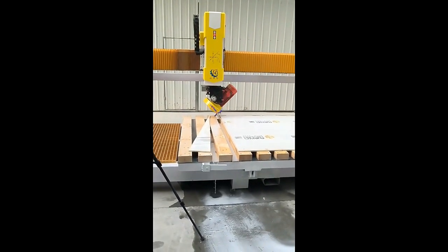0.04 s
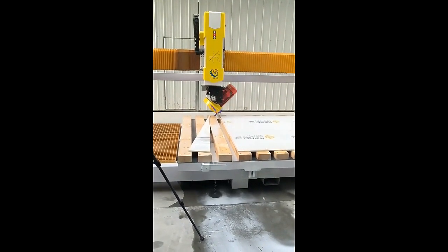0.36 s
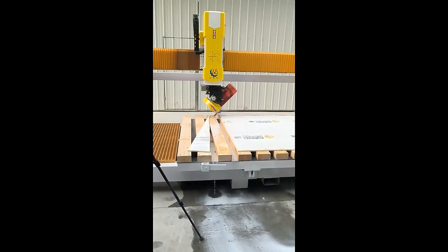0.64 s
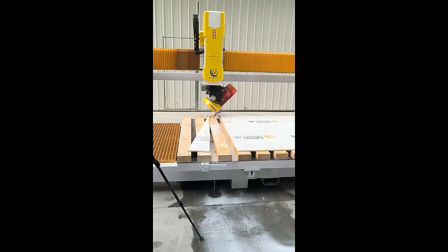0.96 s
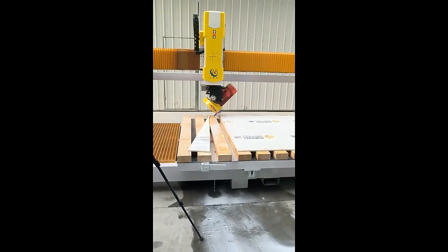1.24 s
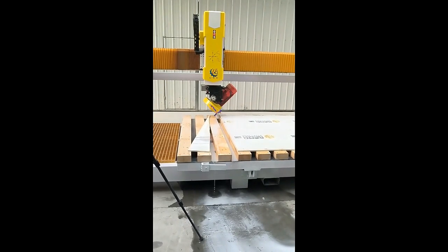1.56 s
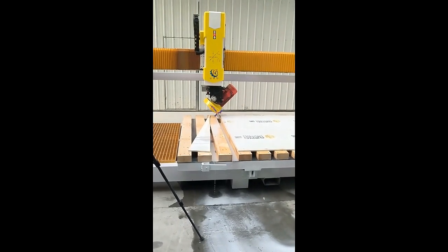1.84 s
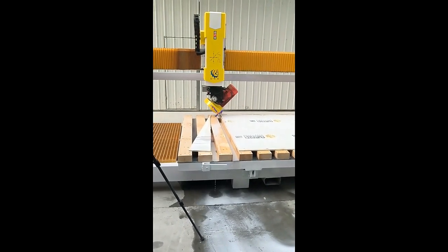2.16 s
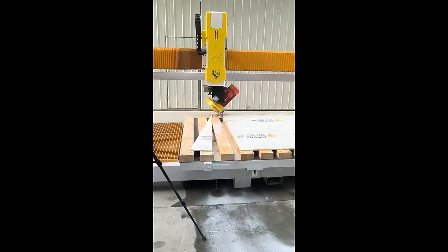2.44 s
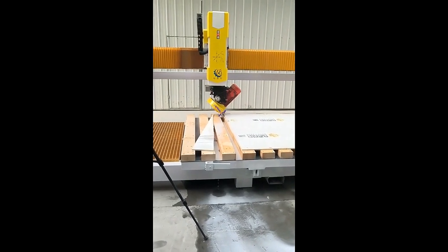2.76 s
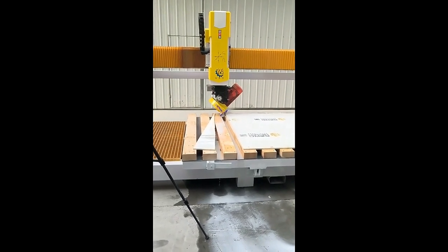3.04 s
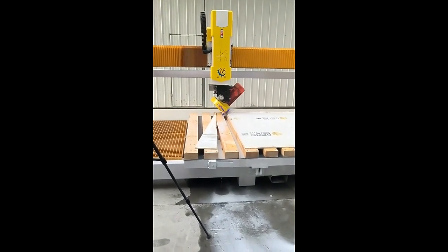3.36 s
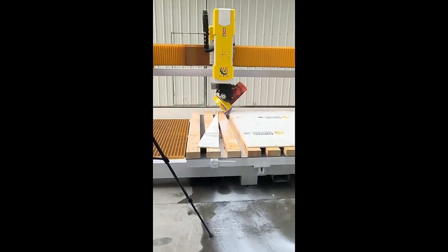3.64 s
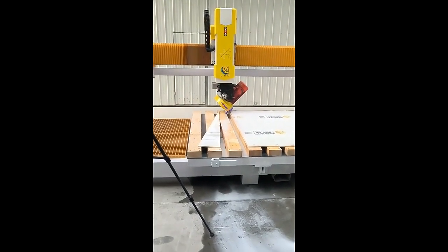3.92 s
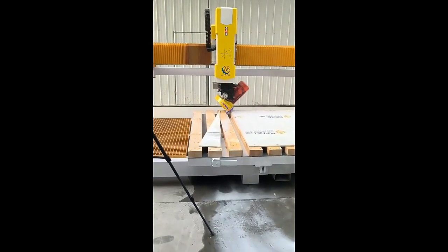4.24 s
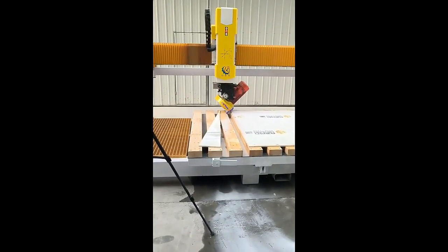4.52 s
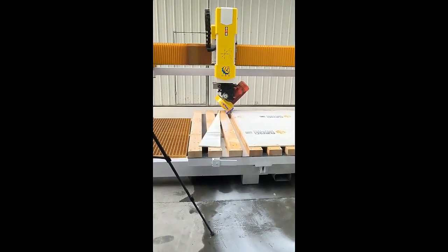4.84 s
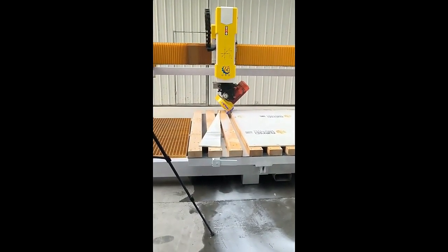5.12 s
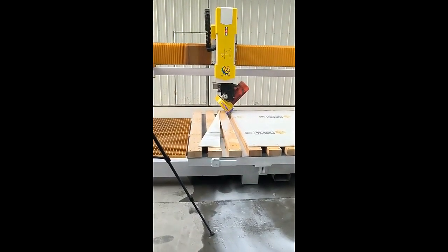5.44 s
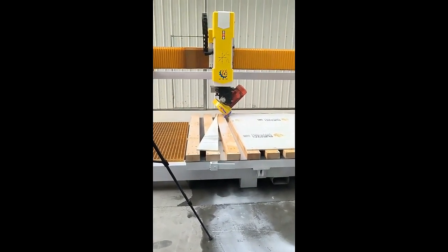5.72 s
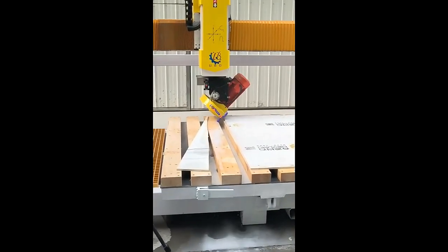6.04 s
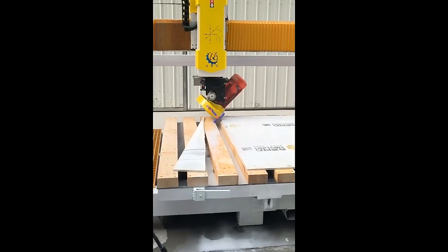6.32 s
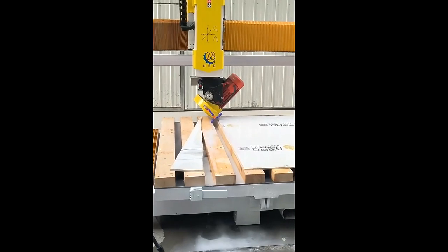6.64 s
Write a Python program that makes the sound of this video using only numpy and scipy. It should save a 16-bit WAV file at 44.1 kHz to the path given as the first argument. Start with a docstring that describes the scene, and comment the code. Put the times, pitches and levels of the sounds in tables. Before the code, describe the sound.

A stone saw hums with hissing cooling water, then its blade bites into a slab with a loud, harsh, ringing grind.

```python
"""A bridge saw for stone hums in a workshop, its blade spinning free in the hiss of cooling water.
Two short spurts of air and water escape a valve, and a few drops tick on the wet table.
Near 3 s the blade crunches into the slab: each turn of its rim repeats nearly the same scrape,
a harsh buzz in a hiss of grit and spray. The steel rings and squeals in shifting modes,
finds its groove, and the slab drones louder as the cut deepens."""
import sys
import numpy as np
from scipy import signal
from scipy.fft import irfft
from scipy.io import wavfile
from scipy.ndimage import map_coordinates

SR = 44100
rng = np.random.default_rng(int(sys.argv[2]) if len(sys.argv) > 2 else 0)


def store_pcm(level_fs):
    """Save levels as 16-bit WAV."""
    pcm = np.round(np.clip(level_fs, -1, 1) * 32767).astype(np.int16)
    wavfile.write(sys.argv[1], SR, np.atleast_2d(pcm).T)


N = 303408
HOP = 256
TIME = np.arange(N) / SR
FRAME_S = np.arange(N // HOP + 5) * HOP / SR
BIN_HZ = np.fft.rfftfreq(4 * HOP, 1 / SR)

FREE_HZ, LOADED_HZ = 49.92, 49.73  # blade turns per second
BITE_S = 2.912
# faders of the cut's layers: (grazing [dB], full depth [dB])
DRONE_DB, BUZZ_DB, GRIND_DB = (-27.5, -19), (-28, -27), (-20, -23)

# tone colour of the rim's scrape: (frequency [Hz], level [dB])
SCRAPE_EQ = [(1900, -47), (2050, -4), (2200, -5.5), (2600, -0.5), (3600, -2.5), (4400, -3.5), (5200, -0.5),
             (6500, -2), (7800, -4), (8700, -11), (9300, -9), (11000, -14), (12000, -27)]
# tone colour of loose grit and spray: (frequency [Hz], level [dB])
SPRAY_EQ = [(30, -34), (70, -44), (130, -6.5), (220, 4), (400, -6.5), (600, -23), (900, -14.5),
            (1400, -5.5), (2200, -4.5), (3200, -6), (4400, -6.5), (6500, -4.5), (9000, -2), (11500, -12)]
# modes of the steel blade: (frequency [Hz], width [Hz], grazing boost [dB], full-depth boost [dB])
BLADE_MODES = [(2367, 97, -10, 3.5), (2622, 18, 7, 16.5), (2810, 93, -1.5, 6), (3040, 43, 2, 6.5),
               (3170, 90, 1.5, -1), (3270, 77, 7, 2), (3625, 82, 8.5, 8), (4150, 130, 6.5, 3.5),
               (4480, 92, 7, 1.5), (5156, 105, 10, 8), (5634, 48, 14, 9), (5850, 100, 3, 3),
               (6375, 200, 6, 7), (6640, 45, 16, 3.5), (6980, 200, 7.5, 3.5), (7300, 250, 1, 3),
               (8220, 80, 5, 9.5), (8390, 120, 6.5, 13), (9070, 190, 1.5, 6.5), (9400, 200, 5.5, 6),
               (9900, 150, 7, 9.5), (10970, 790, 7.5, 7)]
# hollows where the blade hardly radiates: (frequency [Hz], width [Hz], gain [dB])
BLADE_HOLLOWS = [(2150, 130, -3), (2470, 70, -4), (2930, 90, -8), (3300, 70, -4), (3890, 130, -7),
                 (4280, 110, -6), (6070, 90, -3), (8700, 260, -2.5)]
# the rim catches and a tone sings out: (time [s], length [s], frequency [Hz], width [Hz], boost [dB])
RIM_SQUEALS = [(2.97, .13, 2680, 90, 12), (3.03, .1, 1193, 50, 9), (3.1, .2, 1392, 50, 7),
               (3.29, .2, 1590, 60, 3), (3.22, .3, 696, 50, 5), (3.05, .17, 5090, 110, 7),
               (3.08, .1, 5635, 90, 7), (3.13, 0.13, 4840, 110, 16), (3.26, .12, 5700, 80, 5),
               (3.51, .17, 1243, 50, 12), (3.51, 0.18, 5635, 100, 10), (3.59, .2, 895, 55, 11),
               (3.6, .14, 8490, 90, 6), (3.75, .3, 1545, 50, 3), (3.66, 0.28, 299, 50, 8),
               (3.75, .4, 249, 45, 6), (4.098, .5, 302, 50, 8.5), (3.84, .13, 5130, 130, 4),
               (3.85, .14, 8500, 90, 8), (3.95, .3, 8265, 70, 8), (3.94, .18, 6715, 90, 7),
               (3.93, .55, 5630, 90, 6), (4.07, .17, 7000, 170, 10), (4.35, .18, 6180, 100, 12),
               (4.42, .24, 5680, 90, 7), (4.35, 0.55, 5925, 100, 8), (4.35, .5, 7270, 260, 4),
               (4.397, .5, 1335, 100, 3), (4.7, .55, 1392, 50, 8), (4.78, .3, 720, 220, 2),
               (4.76, .25, 3140, 220, 6), (5.0, .3, 1180, 90, 7), (5.3, .25, 3740, 90, 9),
               (4.75, 0.65, 9180, 160, 8), (4.9, .18, 6715, 100, 12), (5.0, .26, 6390, 140, 9),
               (5.0, 0.65, 994, 50, 7), (5.1, .7, 646, 50, 6), (5.95, .6, 845, 50, 5),
               (6.25, .8, 1640, 50, 8), (6.4, .35, 1392, 50, 6), (6.55, .6, 3630, 150, 2),
               (5.6, .34, 7280, 130, 7), (5.97, .46, 7350, 130, 6), (5.77, 1.0, 7340, 380, 8),
               (6.7, .12, 5620, 90, 6), (6.682, .7, 1292, 45, 9), (6.6, .6, 6560, 350, 5),
               (6.8, 0.28, 6650, 110, 11)]
# the slab's drone: (multiple of blade speed, grazing level [dB], full-depth level [dB])
DRONE_PARTIALS = [(2, -49, -45), (3, -9.5, -11.5), (4, 3.5, 0.5), (5, -30.5, -10.5), (6, -16, -10.5),
                  (7, -4, -21.5), (8, -21, -21.5), (9, -7.5, -29)]
# modes of slab and frame: (frequency [Hz], width [Hz], grazing level [dB], full-depth level [dB])
SLAB_MODES = [(497, 40, -16, -23), (546, 29, -9.5, -11), (601, 45, -32, -19), (697, 75, -11, -13.5),
              (746, 40, -20, -15), (807, 33, -10, -19.5), (875, 75, -16.5, -21), (945, 44, -22, -12.5),
              (995, 40, -24, -18.5), (1140, 56, -24, -15.5), (1296, 110, -7, -11.5), (1370, 32, -5, -21),
              (1570, 63, -3, -9.5), (2010, 840, -18, -16)]
# the blade damps the slab's low modes: (time [s], length [s], frequency [Hz], width [Hz], gain [dB])
SLAB_DAMPS = [(3.3, .45, 149, 45, -3), (3.57, 0.16, 190, 70, -4.5), (3.55, .17, 590, 340, -10),
              (3.5, .35, 447, 45, -3), (3.73, .08, 950, 180, -8), (4.0, .9, 555, 53, -8),
              (4.05, 0.6, 410, 110, -6), (3.85, .7, 830, 130, -6), (4.25, 1.1, 944, 50, -7),
              (4.85, .7, 1050, 70, -9), (4.95, .7, 1445, 50, -7), (6.05, .65, 497, 45, -9),
              (6.05, .4, 795, 50, -8), (6.25, 1.0, 1590, 50, -6), (6.6, .55, 720, 150, -4)]
# the stone resists more, or gives way: (time [s], length [s], push [dB])
LOAD_SURGES = [(3.226, 0.22, 1), (3.91, 0.4, -0.5), (5.463, 0.19, -2.5), (6.724, 0.11, 2)]
# the blade chips the edge: (time [s], length [s], frequency [Hz], width [Hz], level [dB])
EDGE_CHIPS = [(2.955, 0.09, 1500, 600, -28.5), (2.97, 0.062, 7000, 3500, -34), (3.352, 0.061, 630, 80, -41),
              (3.358, 0.076, 1450, 450, -47)]
# tones of the motors and the free blade: (frequency [Hz], level [dB])
MOTOR_TONES = [(99.9, -53), (199.9, -62), (246.3, -59), (249.5, -59), (281.4, -46.5), (289.2, -67),
               (299.6, -38.5), (318.0, -52.5), (349.5, -61), (364, -62), (417.9, -53), (599.1, -60),
               (1135.4, -62), (1248.3, -66), (1398.0, -53), (1447.8, -62), (1497.9, -62), (1547.7, -56.5)]
# spurts of air and water:
# (time [s], length [s], level [dB], fade [dB/s], treble peak [Hz], spit pitch [Hz], spit boost [dB])
VALVE_SPURTS = [(0.013, 0.089, -35, 6, 7200, 1800, -0.5), (1.525, 0.082, -32, 103, 5700, 1970, 17.5)]
# tone colour of a spurt: (multiple of its treble peak, level [dB])
SPURT_EQ = [(.05, -30), (.13, -9), (.22, -1), (.35, -7), (.55, -6.5), (.8, -4.5), (1, -1.5), (1.2, -2),
            (1.4, -12), (1.8, -22)]
# tone colour of cooling water and workshop air: (frequency [Hz], level [dB])
WATER_EQ = [(18, -76), (32, -60), (86, -19), (229, -6.5), (294, -6), (350, -4), (536, -13), (821, -16.5),
            (1420, -17), (1700, -16.5), (2870, -22), (3280, -25), (4000, -22.5), (6410, -22), (9340, -19),
            (12000, -24.5), (15600, -61), (22000, -120)]
# bands in which the water nozzle sings: (frequency [Hz], width [Hz], boost [dB])
NOZZLE_BANDS = [(1150, 240, 7), (6560, 690, 5.5), (8370, 170, 6), (9540, 390, 4), (11060, 700, 4.5)]
# larger drops of cooling water: (time [s], frequency [Hz], level [dB])
WATER_DRIPS = [(0.555, 6000, -43), (1.885, 5500, -43), (2.248, 2800, -45)]


def cutting(grazing_share=0.49, deep_share=0.53):
    """The blade bites: the rim scrapes, grit and water spray, and the slab shakes."""
    turns = np.cumsum(blade_speed(TIME)) / SR
    depth = sunk(FRAME_S)[:, None]
    scrape_share = grazing_share + sunk(TIME) * (deep_share - grazing_share)
    # random peaks and hollows come and go, strongest around 2-5 kHz
    patchy_db = patches(seconds=.2, width_hz=90) * (1 + 2.3 * bell(BIN_HZ, 3300, 3000))
    grind = np.sqrt(scrape_share) * scrape(turns, depth, patchy_db)
    grind += np.sqrt(1 - scrape_share) * spray(turns, depth, patchy_db)
    grind *= load_gain(GRIND_DB, TIME, push_share=0.08)
    contact = ramp(TIME, BITE_S, 0.033)
    return contact * (slab_shaking(turns, depth) + chips() + rumble() + grind)


def scrape(turns, depth, patchy_db, wear_s=0.29, chatter_s=0.024, sweep_hz=3300, lock_db=15, count=242):
    """The diamond segments repeat their scrape every turn; it changes slowly as the contact shifts."""
    hz = np.arange(1, count + 1) * LOADED_HZ
    lasting = 0.45 * (1 + depth) / 2 * np.exp(2j * np.pi * rng.random(count))
    wear = drift(wear_s, count)
    # a proud segment strikes; the steel spreads the blow
    strike = 0.41 * np.exp(1j * np.pi * hz ** 2 / (sweep_hz * LOADED_HZ))
    jitter = 0.38 + 0.05 * seated(FRAME_S)[:, None]
    chatter = jitter * hz / 6000 * drift(chatter_s, count)  # smears the high partials most
    rim = lasting + wear + strike + chatter
    boost_db = blade_ringing(hz)
    locked = np.clip(boost_db / lock_db, 0, 1) ** 2  # partials on a strongly ringing mode hold steady
    rim /= (abs(rim) + 1e-9) ** locked
    tilt_db = 3 * (1 - depth) * np.log2(hz / 5000)
    db = boost_db + (1 - locked) * patchy_db[:, np.searchsorted(BIN_HZ, hz)] + tilt_db
    return spin(levelled(colour(SCRAPE_EQ, hz) * amp(db) * rim), turns)


def spray(turns, depth, patchy_db, ring_share=0.69, flicker_db=1.23):
    """Grit and water fly off the rim in surges, brighter and crunchier while the cut is shallow."""
    open_db = (1 - depth) * (4 * bell(BIN_HZ, 9100, 8700) + 3 * bell(BIN_HZ, 1900, 710))
    thin_db = -9 * (1 - depth ** 2) * bell(BIN_HZ, 310, 450)
    db = ring_share * blade_ringing(BIN_HZ) + patchy_db + open_db + thin_db
    shape = levelled(colour(SPRAY_EQ, BIN_HZ) * amp(db))
    hiss = noise(shape * amp(slab_damping(BIN_HZ) + flicker_db * drift(0.02).real))
    angle = 2 * np.pi * turns
    return hiss * (1 + 0.078 * np.cos(angle) + 0.11 * np.cos(2 * angle))


def blade_ringing(hz, skating_waver=0.0022, seated_waver=.0012, flutter=0.2):
    """A moving EQ in dB: the steel's wavering modes, the hollows between them and the squeals."""
    t = FRAME_S[:, None]
    waver = skating_waver + (seated_waver - skating_waver) * seated(t)
    wanders = drift(0.063, len(BLADE_MODES)).T[:, :, None]
    modes = 0
    for (f, width, grazing, deep), wander in zip(BLADE_MODES, wanders):
        boost_db = (grazing + (deep - grazing) * sunk(t)) * (1 + flutter * wander.imag)
        modes += boost_db * bell(hz, f * (1 + waver * wander.real), width)
    hollows = sum(db * bell(hz, f, width) for f, width, db in BLADE_HOLLOWS)
    squeals = sum(db * held(t, s, length) * bell(hz, f, width) for s, length, f, width, db in RIM_SQUEALS)
    return modes + hollows + squeals


def slab_shaking(turns, depth, rasp_s=4.6, build_s=0.084, count=40):
    """The uneven rim pushes the slab as it turns: a drone and a buzz that steady as the cut deepens."""
    order = np.arange(1, count + 1)
    hz = order * LOADED_HZ
    low = hz < 450
    sway_db = (1 - depth) * curve(DRONE_PARTIALS, order) + depth * curve(DRONE_PARTIALS, order, column=2)
    db = np.where(low, sway_db, slab_response(hz, depth)) + blade_ringing(hz)
    looseness = np.where(low, .35, 1)  # the heavy low modes are the steadiest
    roughness = looseness * (0.64 - 0.19 * depth)
    # midway the upper partials pull closer into step: one hard rasp a turn
    rasping = 0.23 * bell(FRAME_S, rasp_s, 1.7)[:, None] * (hz > 1100)
    # the wobbling blade sways and knocks the slab; the hall scatters the knocks
    scatter = (1 - rasping) * 1.48 * looseness * rng.standard_normal(count)
    phases = np.exp(1j * (np.pi / 2 * order ** 2 * low + scatter))
    unsteady = 1 + roughness * (drift(0.25, count) + .5 * drift(0.014, count))
    partials = amp(db) * phases * unsteady
    t = FRAME_S[:, None]
    drone = load_gain(DRONE_DB, t, push_share=0.61) * levelled(partials * low * (order > 1))
    buzz = load_gain(BUZZ_DB, t, push_share=1) * levelled(partials * ~low)
    age = np.maximum(t - BITE_S, 0)
    build_up = 1 - np.exp(-(age / build_s) ** 2 * hz / 200)  # low modes answer late
    return spin((drone + buzz) * build_up * amp(slab_damping(hz)), turns)


def slab_response(hz, depth, valley_db=-29):
    """Resonances of slab and frame in dB; depth shifts the weight among the modes."""
    power = sum((amp(grazing + (deep - grazing) * depth) / (1 + (2 * (hz - f) / width) ** 2)) ** 2
                for f, width, grazing, deep in SLAB_MODES)
    return 10 * np.log10(power + amp(valley_db) ** 2)


def slab_damping(hz):
    """Passing notches in dB where the advancing blade presses on the slab."""
    return sum(db * held(FRAME_S[:, None], s, length) * bell(hz, f, width)
               for s, length, f, width, db in SLAB_DAMPS)


def blade_speed(t, slowing_s=0.3542, sag_s=3.46, sag_hz=.45):
    """Turns per second: the blade slows under load and sags once before the motor catches up."""
    return FREE_HZ + (LOADED_HZ - FREE_HZ) * ramp(t, BITE_S, slowing_s) - sag_hz * bell(t, sag_s, .22)


def sunk(t):
    """Depth of the cut, 0-1: after grazing the edge the blade sinks, quickly at first."""
    return 1 - (1 - ramp(t, start_s=3.46, length_s=1.83)) ** 2


def seated(t):
    """0 while the blade skates on the edge, 1 once it runs in its groove."""
    return ramp(t, start_s=3.7, length_s=0.18)


def load_gain(levels_db, t, push_share, load_power=3.2):
    """Fader ride for one layer of the cut: it follows the load, and its share of each surge."""
    grazing_db, deep_db = levels_db
    push_db = sum(db * bell(t, s, length) for s, length, db in LOAD_SURGES)
    return amp(grazing_db + (deep_db - grazing_db) * sunk(t) ** load_power + push_share * push_db)


def chips():
    """The edge crumbles: short rough bursts in the slab's resonances."""
    return sum(amp(db) * held(TIME, s, length) * noise(bell(BIN_HZ, f, width))
               for s, length, f, width, db in EDGE_CHIPS)


def rumble(db=-67, lumpy_db=10):
    """Faint, lumpy bass under the cut."""
    lumps = amp(lumpy_db * np.tanh(drift(0.06).real))
    return amp(db) * noise(bell(BIN_HZ, 55, 80) * lumps)


def motor_hum(waver=0.021, throb=0.2, ebb_s=1.15):
    """Motors and free blade hum; the close tones near 300 Hz beat unevenly and ebb once."""
    ebb_db = -10.5 * bell(TIME, ebb_s, 1.0)
    count = len(MOTOR_TONES)
    out = np.zeros(N)
    for (hz, db), slow, quick in zip(MOTOR_TONES, drift(0.27, count).T, drift(0.047, count).T):
        beating = bell(hz, 319, 52)
        unsteady = np.interp(TIME, FRAME_S, 1 + waver * slow + throb * beating * quick)
        tone = np.exp(2j * np.pi * (hz * TIME + rng.random()))
        out += amp(db + ebb_db * beating) * (unsteady * tone).real
    return np.sqrt(2) * out


def spurts(rise_s=0.00073, tail_s=0.028, spit_width_hz=950, sputter_hz=85):
    """A valve lets out a sputtering hiss that loses pressure, then dies away in the hall."""
    out = np.zeros(N)
    for s, length, db, fade_db_per_s, bright_hz, spit_hz, spit_db in VALVE_SPURTS:
        age = np.maximum(TIME - s, 0)
        gate = ramp(TIME, s, rise_s) * np.exp(-np.maximum(age - length, 0) / tail_s)
        sputter = 1 + 0.17 * np.cos(2 * np.pi * sputter_hz * age)
        shape = amp(curve(SPURT_EQ, BIN_HZ / bright_hz) + spit_db * bell(BIN_HZ, spit_hz, spit_width_hz))
        out += amp(db - fade_db_per_s * age) * gate * sputter * noise(shape)
    return out


def drips(decay_s=0.0065):
    """Single larger drops tick on the wet table."""
    return sum(amp(db) * (TIME > s) * np.exp(-abs(TIME - s) / decay_s) * noise(bell(BIN_HZ, f, .4 * f))
               for s, f, db in WATER_DRIPS)


def cooling_water(hiss_db=-41.5, patter_db=-59, flicker_db=.45, drops_per_s=250, decay_s=0.0049):
    """The bed: an almost steady nozzle hiss, with small drops pattering on the slab."""
    nozzle_db = sum(db * bell(BIN_HZ, f, width) for f, width, db in NOZZLE_BANDS)
    treble_db = flicker_db * drift(0.069).real * (BIN_HZ > 2000)
    hiss = noise(colour(WATER_EQ, BIN_HZ) * amp(nozzle_db + treble_db))
    drops = (rng.random(N) < drops_per_s / SR) * amp(10 * np.minimum(rng.exponential(1, N), 4))
    envelope = signal.lfilter([1], [1, -np.exp(-1 / (decay_s * SR))], drops)
    patter = envelope * noise(bell(BIN_HZ, 7100, 7900))
    return amp(hiss_db) * hiss + amp(patter_db) * unit(patter)


def spin(partials, turns, size=2048):
    """Loops one turn's waveform, built from frames x partials, at the blade's angle."""
    rim = irfft(np.pad(partials, ((0, 0), (1, 0))), size, axis=1) * size / np.sqrt(2)
    rim = np.hstack([rim, rim[:, :1]])
    return map_coordinates(rim, [np.arange(N) / HOP, turns % 1 * size], order=1)


def patches(seconds, width_hz, ceiling=0.73):
    """Random peaks and hollows of rms 1, frames x bins, that come and go."""
    knots = drift(seconds, 400).real
    grid = np.meshgrid(np.arange(len(FRAME_S)), BIN_HZ / width_hz, indexing="ij")
    field = unit(map_coordinates(knots, grid, order=1, mode="mirror"))
    return unit(np.minimum(field, ceiling))  # hollows run deeper than peaks stand high


def drift(seconds, count=1):
    """Smooth complex random modulation, frames x count, that wanders on the given time scale."""
    white = rng.standard_normal((2 * len(FRAME_S), count, 2)) @ [1, 1j]
    rate_hz = np.fft.fftfreq(len(white), HOP / SR)[:, None]
    spectrum = np.fft.fft(white, axis=0) / (1 + (np.pi * rate_hz * seconds) ** 2)
    return unit(np.fft.ifft(spectrum, axis=0)[:len(FRAME_S)])


def noise(shape):
    """Noise of rms 1 with the given short-time spectrum."""
    white = rng.standard_normal((len(FRAME_S), len(BIN_HZ), 2)) @ [1, 1j]
    return unit(signal.istft((white * shape).T, nperseg=4 * HOP, noverlap=3 * HOP)[1][:N])


def colour(points, hz):
    """Gain of an EQ drawn as points on a log-frequency axis."""
    f, db = np.transpose(points)
    return amp(np.interp(np.log(hz + 1), np.log(f + 1), db))


def curve(rows, x, column=1):
    """Reads a table's column along straight lines between its rows."""
    rows = np.asarray(rows, float)
    return np.interp(x, rows[:, 0], rows[:, column])


def bell(x, centre, width):
    """A hump of height 1 and the given width at half height."""
    return 2. ** -(2 * (x - centre) / width) ** 2


def held(t, middle, length):
    """A hump of height 1 with a flat top."""
    return 2. ** -(2 * (t - middle) / length) ** 4


def ramp(t, start_s, length_s):
    """A straight fade from 0 to 1."""
    return np.clip((t - start_s) / length_s, 0, 1)


def levelled(shape):
    """Scales every frame to power 1."""
    return shape / np.sqrt((abs(shape) ** 2).sum(1, keepdims=True) + 1e-20)


def unit(x):
    """Scales to rms 1."""
    return x / np.sqrt(np.mean(abs(x) ** 2) + 1e-20)


def amp(db):
    """Decibels to gain."""
    return 10 ** (np.asarray(db) / 20)


def scene(duck_db=-6):
    """The mix: hum and water duck once the blade is under load; both channels are alike."""
    idle = (motor_hum() + cooling_water()) * amp(duck_db * ramp(TIME, BITE_S, 0.12))
    return np.tile(idle + drips() + spurts() + cutting(), (2, 1))


def record(dry, cutoff_hz=12040):
    """A steep low-pass takes off the top treble."""
    taps = signal.firwin(1023, cutoff_hz, window=("kaiser", 9), fs=SR)
    return signal.oaconvolve(dry, taps[None], "same")


dry = scene()
out = record(dry)
store_pcm(out)
```